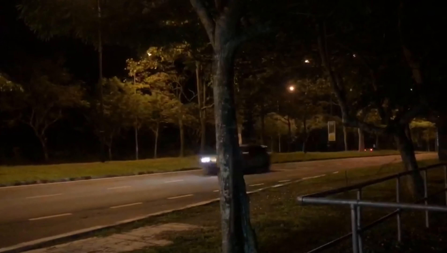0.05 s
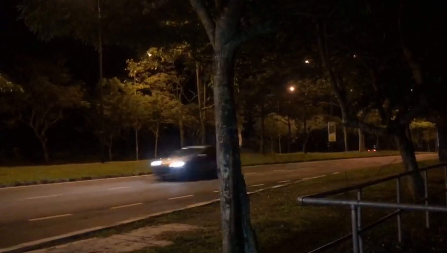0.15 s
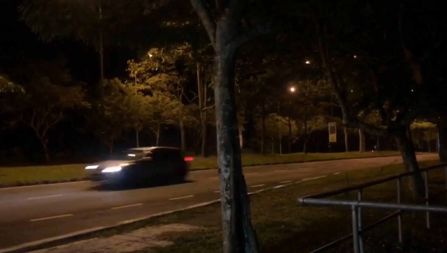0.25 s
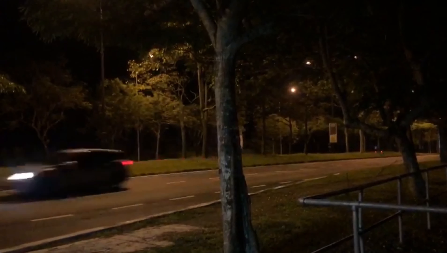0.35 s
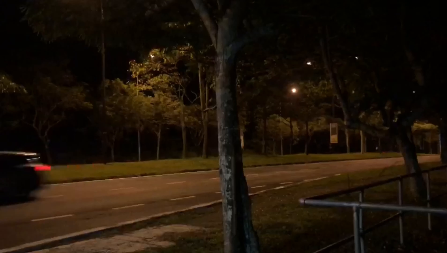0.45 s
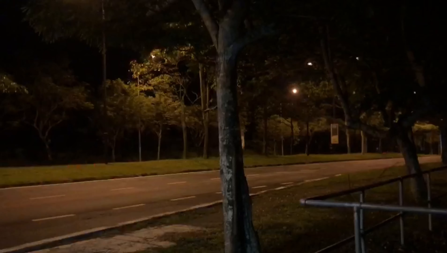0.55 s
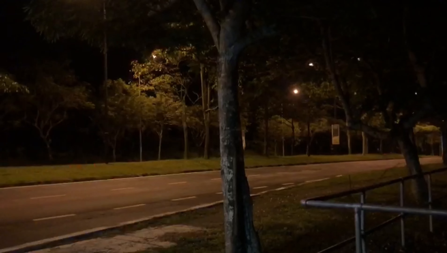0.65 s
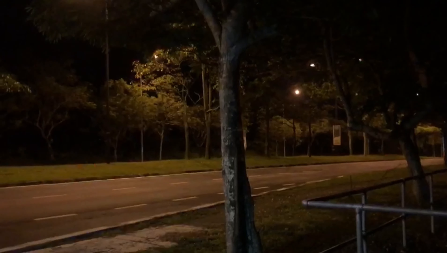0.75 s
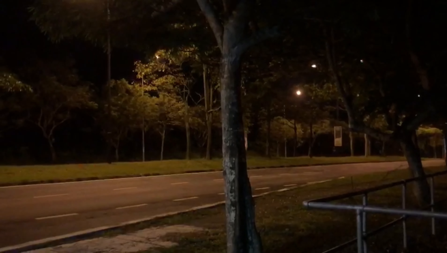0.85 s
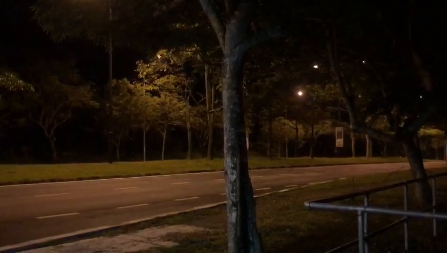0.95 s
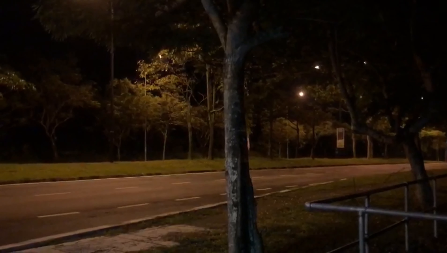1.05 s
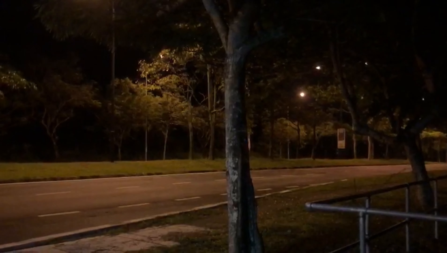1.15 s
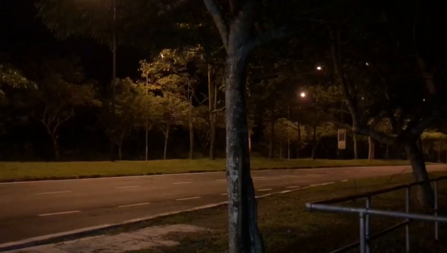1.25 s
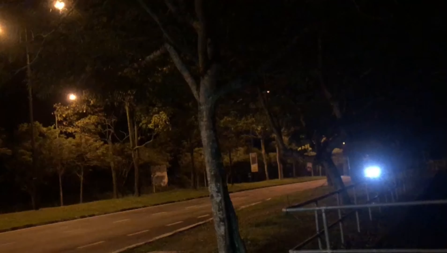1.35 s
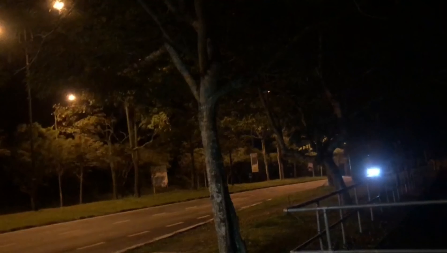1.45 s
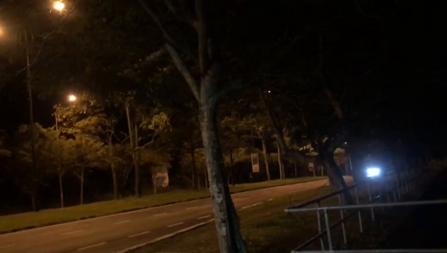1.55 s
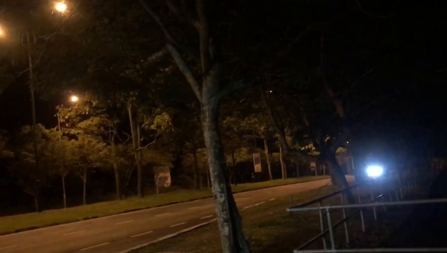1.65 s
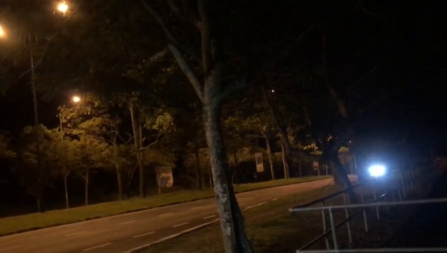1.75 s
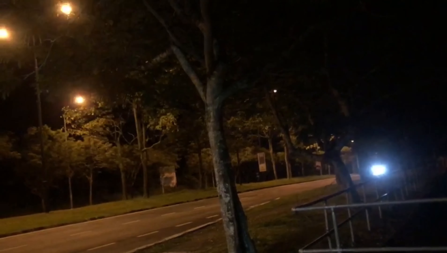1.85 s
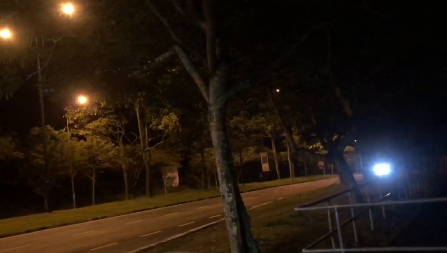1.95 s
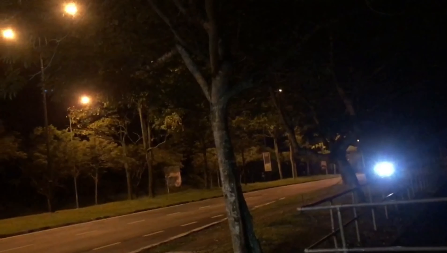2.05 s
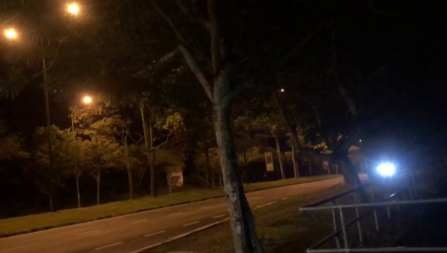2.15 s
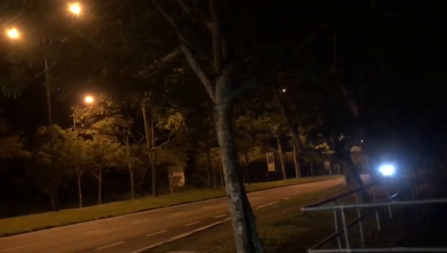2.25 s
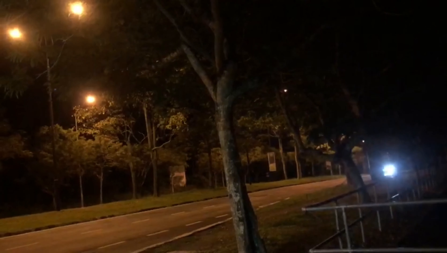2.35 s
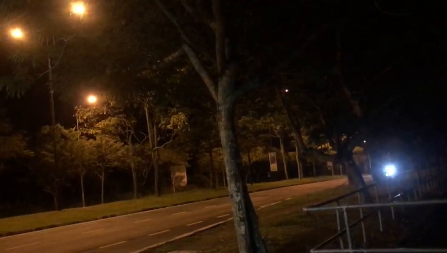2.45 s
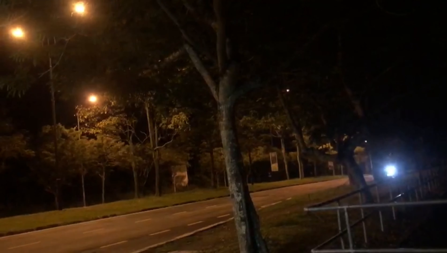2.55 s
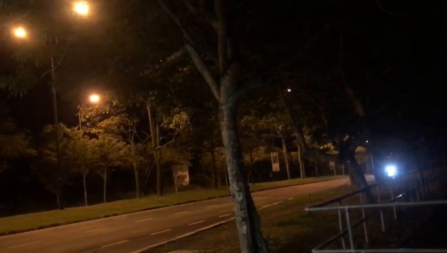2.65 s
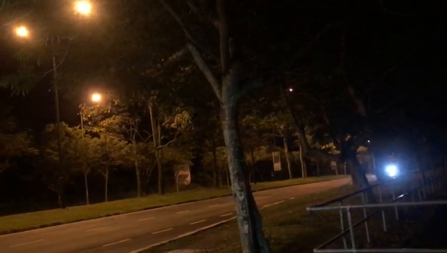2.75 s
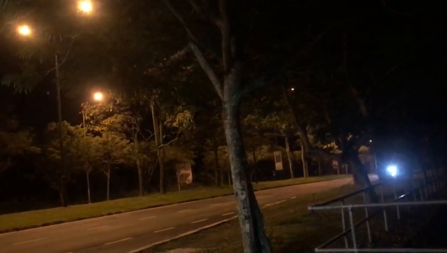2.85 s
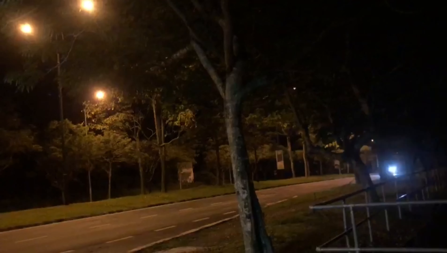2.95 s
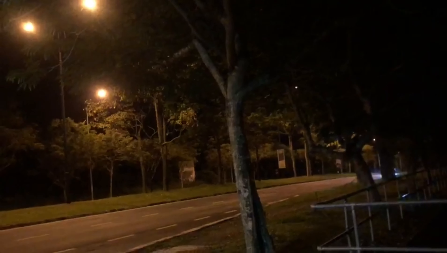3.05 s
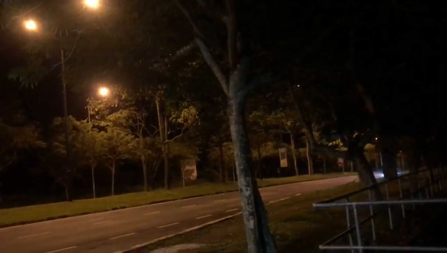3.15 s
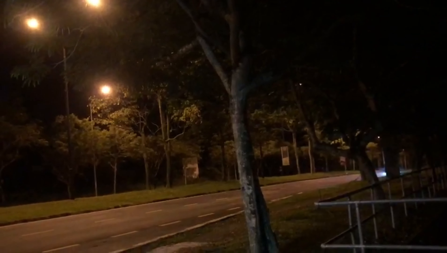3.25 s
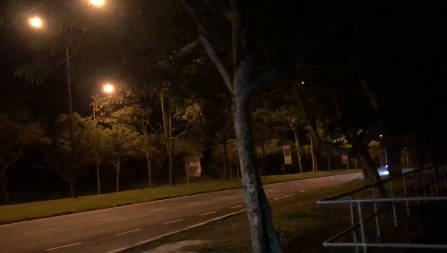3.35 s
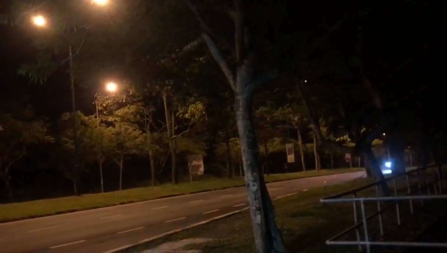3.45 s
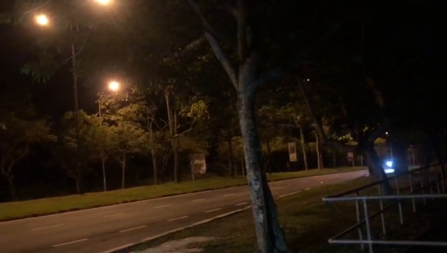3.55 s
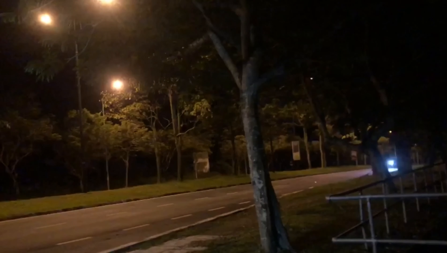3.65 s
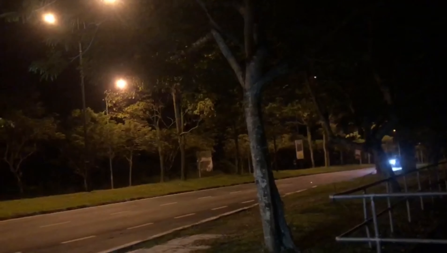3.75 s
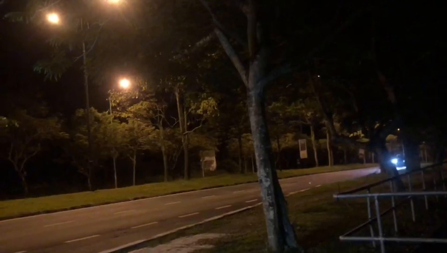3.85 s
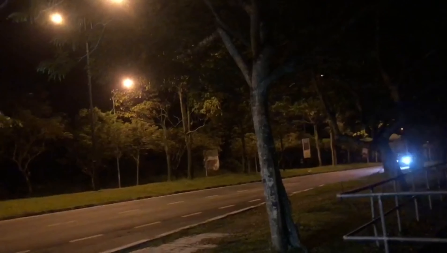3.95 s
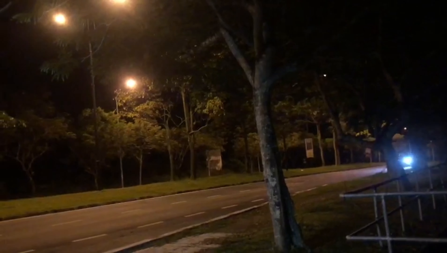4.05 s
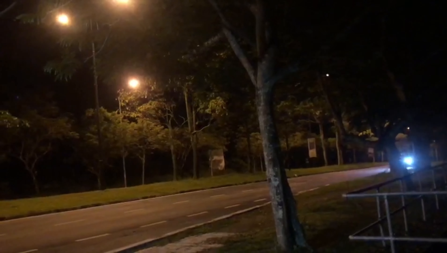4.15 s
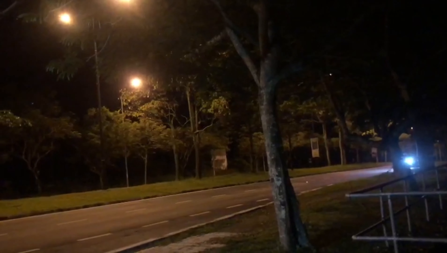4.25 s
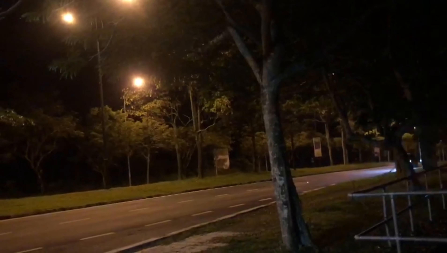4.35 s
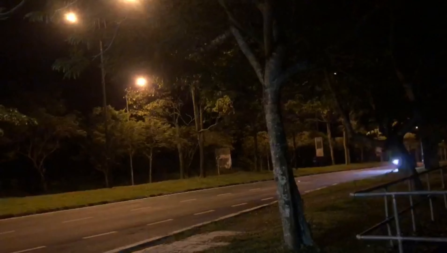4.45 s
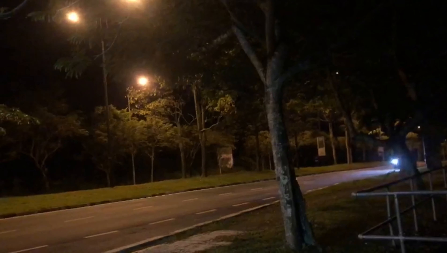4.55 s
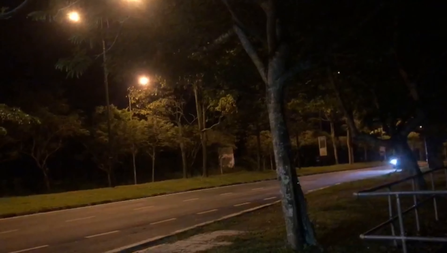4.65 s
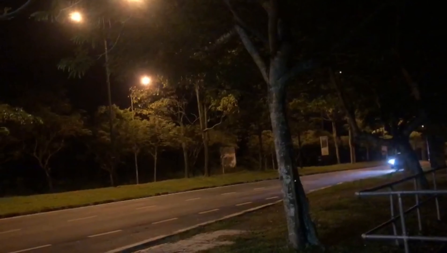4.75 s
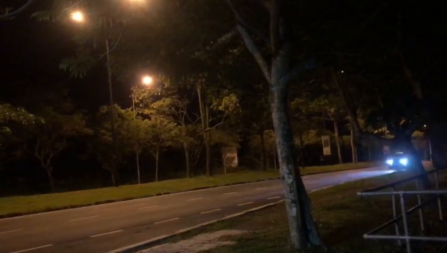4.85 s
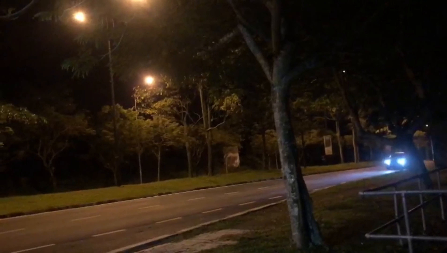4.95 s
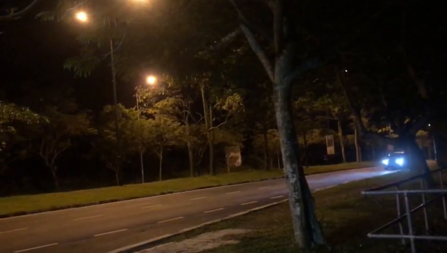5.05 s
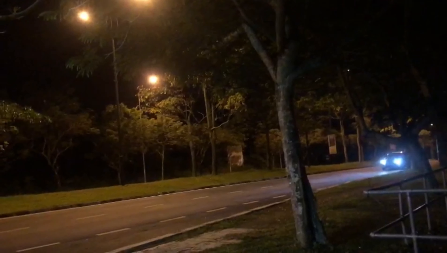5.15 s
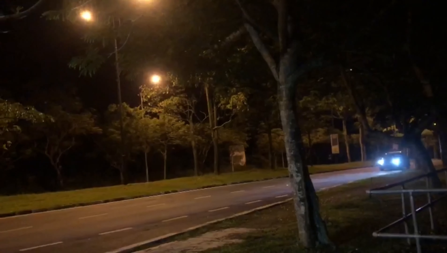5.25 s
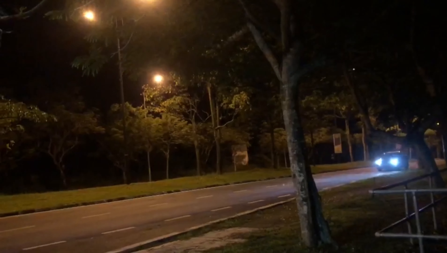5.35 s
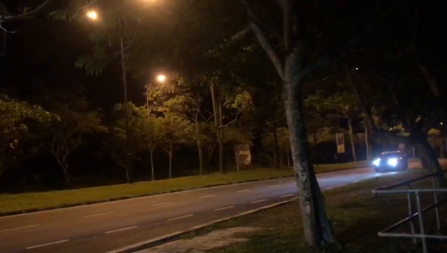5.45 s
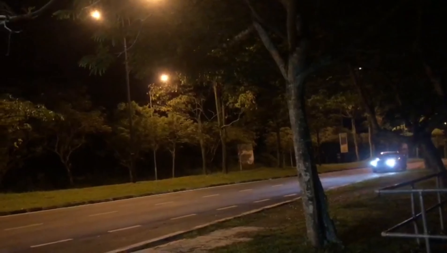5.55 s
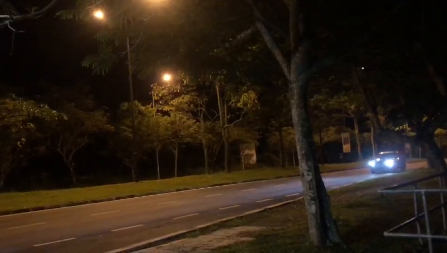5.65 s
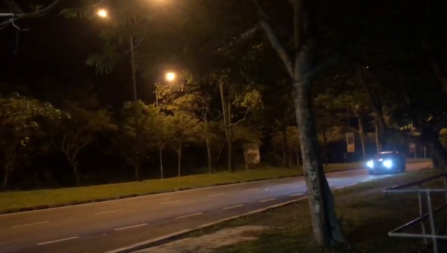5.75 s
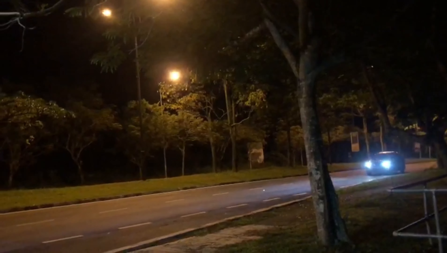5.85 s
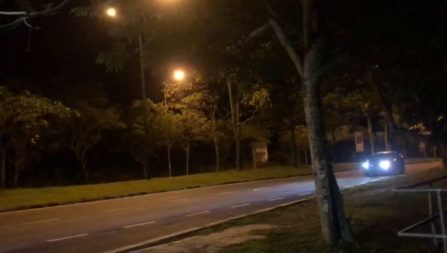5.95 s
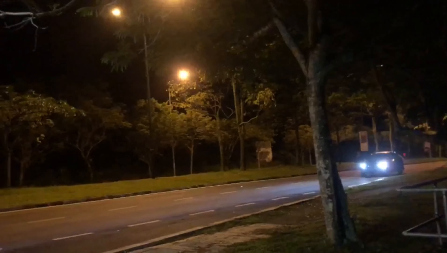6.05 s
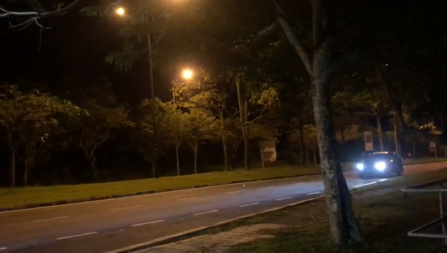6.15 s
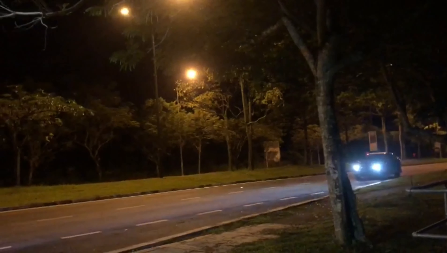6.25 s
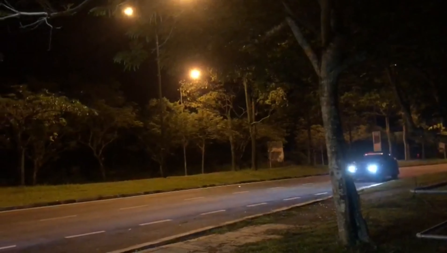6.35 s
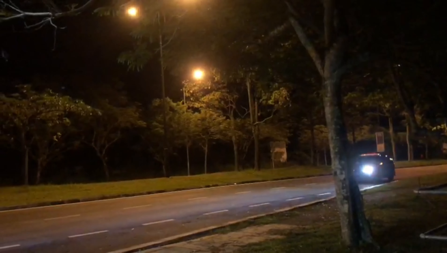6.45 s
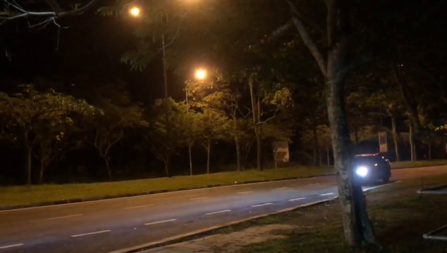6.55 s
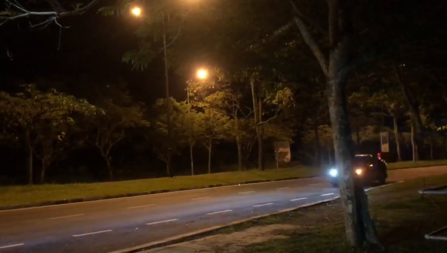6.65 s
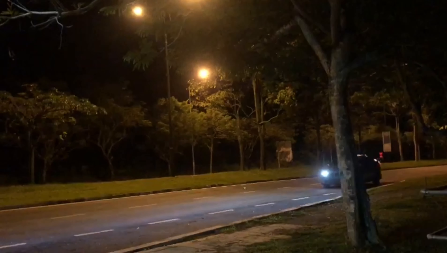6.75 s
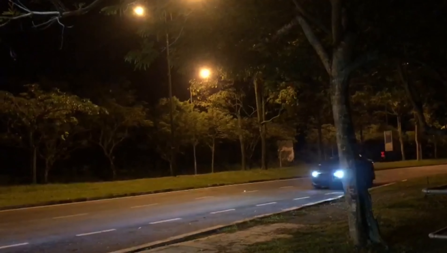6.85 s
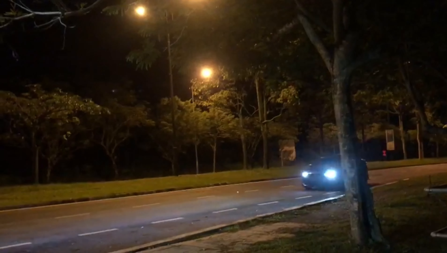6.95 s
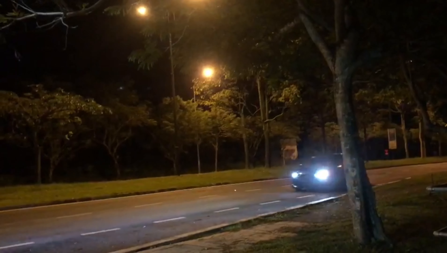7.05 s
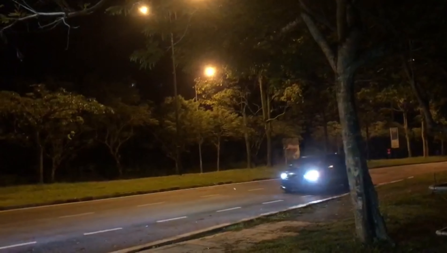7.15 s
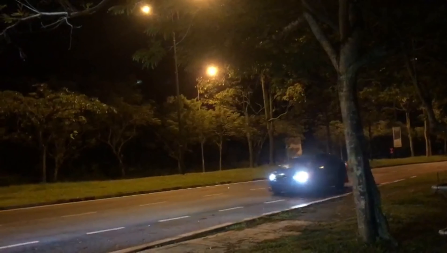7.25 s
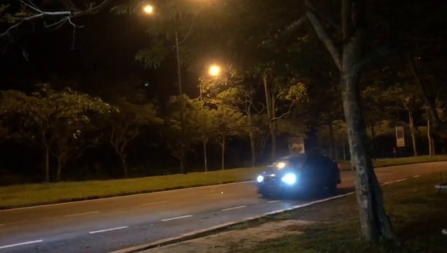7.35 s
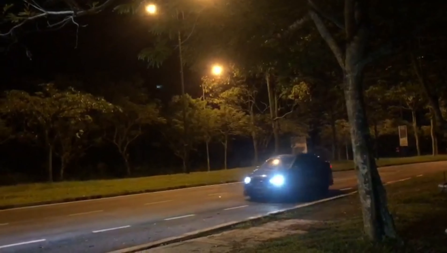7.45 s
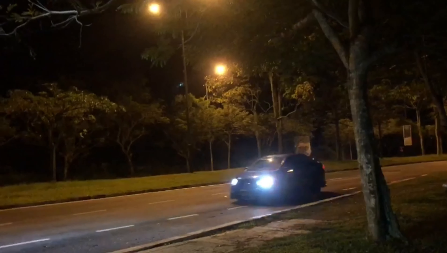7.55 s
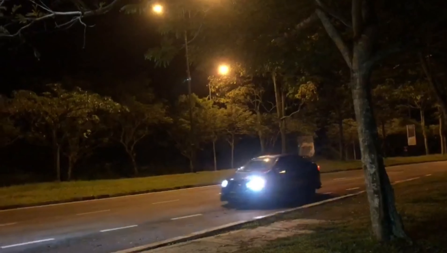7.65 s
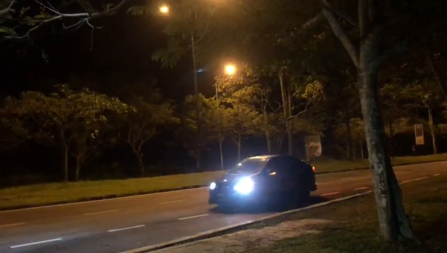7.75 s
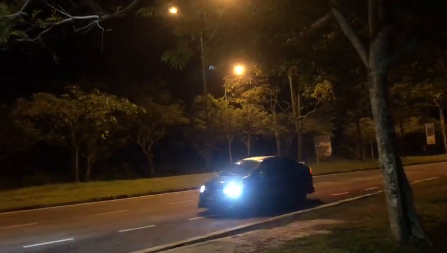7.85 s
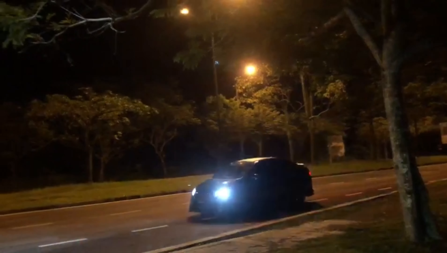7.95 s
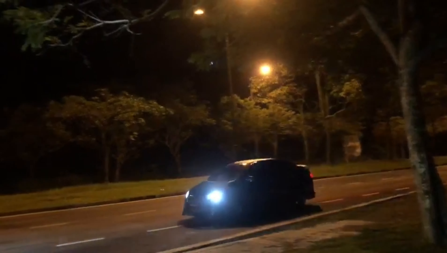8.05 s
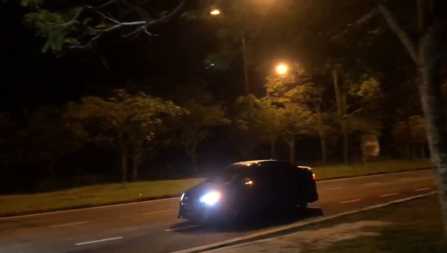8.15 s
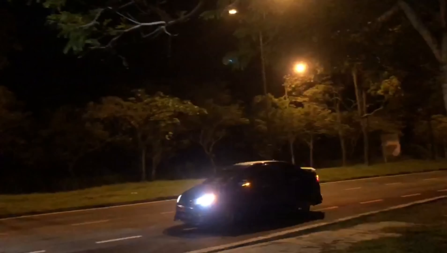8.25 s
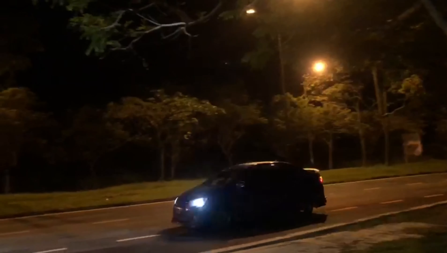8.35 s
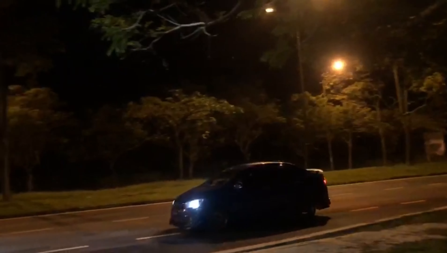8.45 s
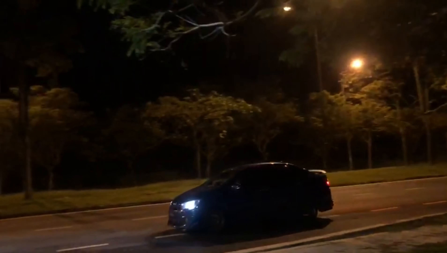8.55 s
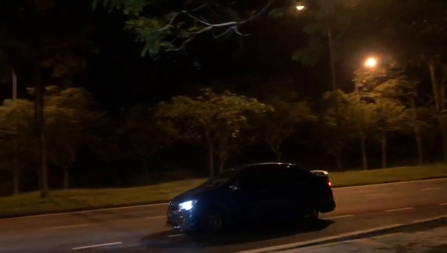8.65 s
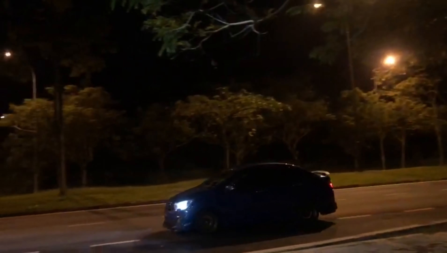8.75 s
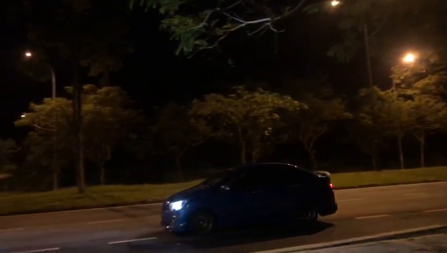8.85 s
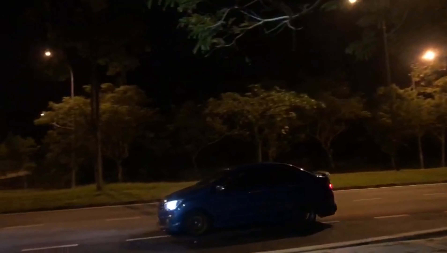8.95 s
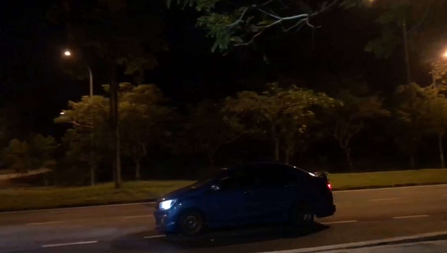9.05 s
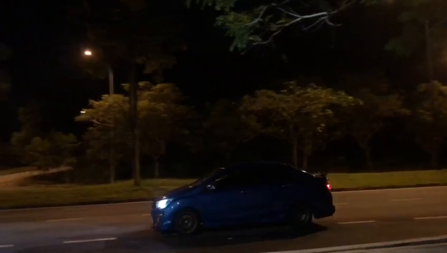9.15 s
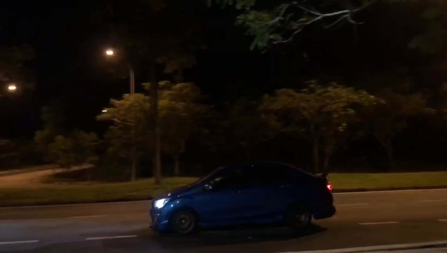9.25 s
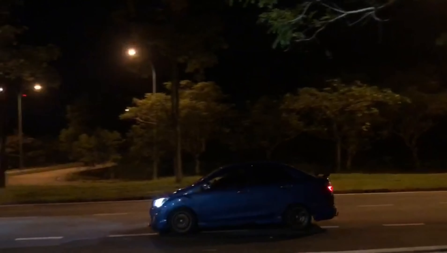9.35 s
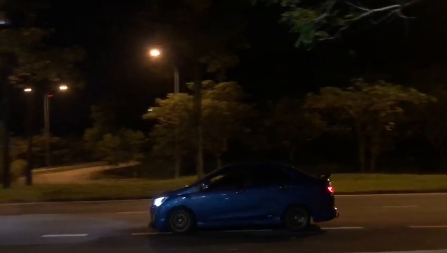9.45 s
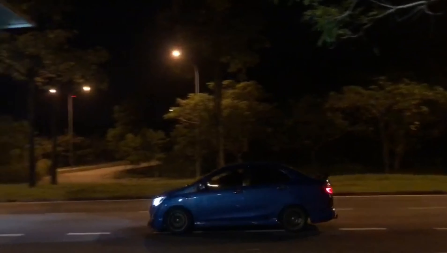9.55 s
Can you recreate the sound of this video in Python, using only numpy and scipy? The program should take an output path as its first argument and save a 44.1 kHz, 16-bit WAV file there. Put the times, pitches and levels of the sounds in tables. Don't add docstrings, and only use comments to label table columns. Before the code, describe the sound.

At a dark roadside, a phone catches a car rushing away with tyre roar and a sagging drone. It cuts abruptly to a much quieter night of crickets and distant town rumble. A car with an open exhaust coasts nearer, its low hum slowly sinking to a lumpy idle burble, tyres hissing softly. At the very end the throttle opens and the exhaust erupts, rising fast, loud, raspy and crackling.

```python
import sys
import numpy as np
from scipy import signal
from scipy.fft import rfft, irfft
from scipy.io import wavfile
from scipy.ndimage import uniform_filter1d

SR = 44100
rng = np.random.default_rng(int(sys.argv[2]) if len(sys.argv) > 2 else 0)


def dump_mix(stems):
    frames = np.atleast_2d(stems).T
    limited = np.clip(frames, -1, 1)
    pcm = np.round(limited * 32767).astype(np.int16)
    wavfile.write(sys.argv[1], SR, pcm)


def how_loud(loudness_db):
    steps = np.asarray(loudness_db, float) / 20
    return 10 ** steps


N = 422919
CUT_S, FADE_IN_S = 1.3542, 0.039

# time_s, drone_db, engine_db, tyre_roar_db
RECEDING_CAR = [(0.0, -36.5, -28, -24), (0.25, -32.5, -47, -24.5), (0.42, -30, -38, -24),
                (0.6, -25, -30.5, -26.5), (0.86, -26.5, -34.5, -30), (1.104, -33, -28, -29.5),
                (1.2, -39, -30.5, -31), (1.35, -37, -28, -34.5)]
# firing_multiple, level_db
RECEDING_ORDERS = [(2, 1), (3, -12), (4, -6), (5, -5.5), (6, -1.5)]
# freq_hz, density_db
RECEDING_ROAD = [(74, -13), (125, -1.5), (173, -3), (203, -6), (228, -2.5), (421, -6.5), (611, -7),
                 (832, -6), (1330, -3.5), (1720, -4), (6000, -30), (7800, -55), (13200, -120)]
# time_s, lag_ms
ROAD_ECHO = [(0, 0.98), (.3, 1.46), (.6, 1.72), (.9, 1.88), (1.35, 1.76)]

# time_s, firing_hz, level_db, boom_db_per_octave below the tail pipe, throttle_0_to_1
ENGINE = [(1.36, 64.46, -47, 1, 0), (2.07, 61.24, -42, -0.5, 0), (2.88, 58.25, -41.5, 1.5, 0.07),
          (3.26, 56.58, -44, -1.5, 0.06), (3.73, 52.62, -34.5, -7.5, 0.03), (4.4, 48.9, -37.5, -11, 0),
          (5.1, 45.08, -37, -4, 0.09), (5.7, 40.96, -34.5, -5.5, 0.04), (6.5, 39.6, -32.5, -3, 0.06),
          (7.2, 36.82, -29.5, -6.5, 0), (8.11, 33.58, -30, -3, 0.02), (8.28, 32.58, -26, -4, .15),
          (9.03, 32.88, -24.5, -0.5, 0.1), (9.2, 40.88, -20, -1, .3), (9.364, 59.37, -10.5, 2.5, 0.47),
          (9.42, 66.1, -9, 2.5, 0.75), (9.465, 71.34, -14, 4, 0.51), (9.59, 85.5, -13.5, 7.5, 0.69)]
# centre_hz, half_width_hz, steepness
PIPES = [
    (100, 21.1, 1.01),
    (180, 10.7, 0.89),
    (245.75, 22.95, 2.62),
]
PIPES_DB = [
    -0.3,
    -2,
    0.9,
]
# centre_hz, half_width_hz
HALF_RING = (242.6, 22)
# centre_hz, width_hz, level_db
RASP = [(374.6, 64, 7.5), (532, 107, -0.5), (741, 124, -2.5), (844, 330, -6.5), (1235, 220, -20)]
# time_s, level_db
SHADES = [
    (2.94, -8),
    (3.92, -5),
    (5.171, -11),
]
# time_s, roar_db
TYRES = [(1.36, -56), (4.41, -51.5), (6.22, -47.5), (7.91, -41.5), (9.22, -44.5), (9.59, -35)]
# freq_hz, density_db
TYRE_ROAR = [(290, 0.5), (500, -3.5), (603, -9), (727, 0), (835, -5), (1030, -6.5), (2010, -7), (3500, -17),
             (4550, -21), (7700, -120)]
# peak_s, level_db, centre_hz, width_hz, half_length_s
WHOOSHES = [
    (6.82, -47, 1360, 560, 0.55),
    (7.71, -51, 2050, 320, 0.35),
    (7.55, -50, 1120, 460, 0.45),
    (8.66, -55, 1533, 180, 0.53),
]
# time_s, peak_db
GRIT = [
    (8.701, -39),
    (8.7143, -31),
    (8.8853, -34),
]

# freq_hz, density_db
TOWN = [(15, -42), (25, -4.5), (117, -4), (194, -6.5), (257, -1), (471, -18), (638, -20.5), (910, -25),
        (2210, -28.5), (5090, -42.5), (6890, -35.5), (7820, -82), (10600, -51), (13800, -70), (22000, -120)]
# time_s, pitch_hz, level_db
FAN = [(1.36, 643, -55.5), (4.3, 641, -57.5), (6.2, 642, -67)]
# peak_s, level_db, centre_hz, width_hz, half_length_s
RUSTLES = [
    (2.02, -49, 4900, 7000, 0.047),
    (2.455, -56.5, 8060, 2010, 0.092),
    (4.27, -57, 8296, 1987, 0.069),
    (6.28, -57, 8300, 2000, .06),
    (8.152, -55, 8376, 1500, 0.04),
]

# centre_hz, width_hz, level_db, throb_hz
CHORUS = [(13100, 1200, -57.5, 95), (11960, 840, -61, 80), (11530, 850, -61.5, 70), (9400, 640, -68.5, 60),
          (5960, 140, -88.5, 24), (7000, 400, -69, 19)]
# start_s, length_s, level_db, centre_hz, width_hz
TRILLS = [(5.4, 1.155, -64, 7200, 220), (6.83, 0.85, -56, 7254, 220), (7.5, .5, -53, 7200, 240),
          (8.33, 0.64, -53, 7030, 200), (9.03, 0.31, -51, 7070, 260), (3.795, 0.33, -62, 5750, 200),
          (5.1, 1.5, -58, 5920, 260), (6.9, 1.34, -54, 5830, 379.6), (2.27, 0.1996, -60, 12200, 500),
          (4.2, .3, -53, 12160, 501), (5.15, .75, -53, 12150, 500), (9.27, .4, -49, 13100, 1100)]
# last_chirp_s, peak_db
THREES = [(1.5229, -47), (1.7001, -47.5), (1.8738, -47.5), (2.3359, -47.5), (2.6894, -48), (4.2376, -48),
          (4.415, -47.5), (4.5941, -47), (4.7677, -47.5), (4.9443, -48)]
# last_chirp_s, peak_db
TWOS = [(2.0164, -48), (2.1596, -48), (2.5133, -46), (2.8301, -47), (2.9743, -48), (3.1185, -48.5),
        (4.0583, -47.5), (5.0894, -50)]
# end_s, length_s, level_db
PHRASES = [(2.23, 0.73, -51), (3.125, 0.75, -51), (4.045, .76, -52.5), (4.975, .78, -52),
           (5.9, 0.88, -53.5), (6.875, 0.84, -51.5), (7.69, 0.57, -50), (8.5, 0.5, -52), (9.35, .68, -51.5),
           (9.9, .5, -50)]

CRACK_S, CRACK_LEAD = 9.411, 0.42


def level(x, db=0):
    return x * how_loud(db) / np.sqrt(np.mean(x ** 2))


def even(x, span_s):
    return x / np.sqrt(uniform_filter1d(x ** 2, int(span_s * SR)) + 1e-12)


def seconds():
    return np.arange(N) / SR


def columns(table):
    time_s, *rest = np.transpose(table)
    return [np.interp(seconds(), time_s, column) for column in rest]


def sine(hz):
    return np.sin(2 * np.pi * np.cumsum(hz) / SR)


def band(x, hz, width_hz):
    return signal.lfilter(*signal.iirpeak(hz, hz / width_hz, fs=SR), x)


def hiss(hz, width_hz):
    return level(band(band(rng.standard_normal(N), hz, width_hz), hz, width_hz))


def walk(rate_hz):
    hold = int(SR / rate_hz)
    held = np.repeat(rng.standard_normal(N // hold + 1), hold)
    return level(uniform_filter1d(uniform_filter1d(held, hold), hold)[:N])


def coloured(points, flicker_db, rate_hz):
    hz = np.maximum(np.fft.rfftfreq(N, 1 / SR), 1)
    f, db = np.transpose(points)
    shape_db = np.interp(np.log(hz), np.log(f), db, -120, -120)
    spectrum = rfft(rng.standard_normal(N)) * how_loud(shape_db)
    place = 2 * np.log2(hz / f[0])
    total = 0
    for k in range(int(2 * np.log2(f[-1] / f[0])) + 2):
        part = irfft(spectrum * np.clip(1 - abs(place - k), 0, 1), N)
        total = total + part * how_loud(flicker_db * walk(rate_hz))
    return level(total)


def swells(table, flicker_db, rate_hz):
    out = np.zeros(N)
    for peak_s, db, hz, width_hz, half_s in table:
        rise_fall = np.exp(-((seconds() - peak_s) / half_s) ** 2)
        out += how_loud(db + flicker_db * walk(rate_hz)) * rise_fall * hiss(hz, width_hz)
    return out


def gate(start_s, length_s, edge_s):
    t = seconds()
    return np.clip(np.minimum(t - start_s, start_s + length_s - t) / edge_s, 0, 1)


def trees(x, t60_s, wet_db, gap_s):
    t = np.arange(int(t60_s * SR)) / SR
    tail = rng.standard_normal(len(t)) * np.exp(-np.log(1000) * t / t60_s) * (t > gap_s)
    return x + how_loud(wet_db) * signal.fftconvolve(x, tail / np.sqrt(np.sum(tail ** 2)))[:N]


def passing_car():
    drone_db, engine_db, roar_db = columns(RECEDING_CAR)
    lag_ms, = columns(ROAD_ECHO)
    t = seconds()
    drone_hz, sag_hz_per_s, firing_hz = 78, 17, 45.33
    drone = np.sqrt(2) * np.sin(2 * np.pi * (drone_hz * t - sag_hz_per_s * t ** 2 / 2))
    engine = np.zeros(N)
    for k, db in RECEDING_ORDERS:
        phase = 2 * np.pi * k * firing_hz * t + 6 * rng.random() + 0.76 * walk(15.14)
        engine += how_loud(db + 1.6 * walk(9.1)) * np.sin(phase)
    road = coloured(RECEDING_ROAD, flicker_db=0.6, rate_hz=14)
    i = np.arange(N)
    echo = np.interp(i - lag_ms * SR / 1000, i, road)
    road = road + 0.45 * band(echo, 1300, 3000)
    tread = how_loud(-19.5) * hiss(4500, 8000)
    return how_loud(drone_db) * drone + how_loud(engine_db - 3) * level(engine) + how_loud(roar_db) * (level(road, 1) + tread)


def firing_phase(firing_hz):
    phase = np.cumsum(firing_hz) / SR
    return phase - phase[int(CRACK_S * SR)] - CRACK_LEAD


def order_gains(order, step):
    hz, level_db, boom_db, throttle = columns(ENGINE)
    for shade_s, db in SHADES:
        level_db = level_db + db * np.exp(-((seconds() - shade_s) / 0.04) ** 2)
    lift = 1 + 0.0035 * (np.minimum.accumulate(hz) - 33) + 0.15 * throttle
    at_pipe_hz = order * (hz / lift)[::step]
    gain = 0
    for (centre_hz, half_hz, steep), pipe_db in zip(PIPES, PIPES_DB):
        db = level_db + pipe_db + boom_db * np.log2(PIPES[-1][0] / centre_hz)
        off = (at_pipe_hz - centre_hz) / half_hz
        ring = (order % 1 == 0) / (1 + 1j * np.sqrt(2) * off - off ** 2) ** steep
        gain = gain + np.sqrt(2) * how_loud(db[::step]) * ring
    tail_db = level_db + PIPES_DB[2]
    half_db = -7 - 5 * throttle
    narrow = 0.08 + 1 / (1 + ((at_pipe_hz - HALF_RING[0]) / HALF_RING[1]) ** 4)
    is_half = (order % 1 > 0) * (at_pipe_hz > 70) * (at_pipe_hz < 290)
    gain = gain + is_half * how_loud((tail_db + half_db)[::step]) * narrow
    return gain / (1 + 1.3 * throttle[::step] * (68 / at_pipe_hz) ** 4)


def firing_orders(phase):
    step = 64
    order = np.arange(1, 25)[:, None] / 2
    tone = np.zeros(N)
    for k, coarse in zip(order[:, 0], order_gains(order, step)):
        gain = np.interp(np.arange(N), np.arange(0, N, step), coarse)
        turn = 2 * np.pi * k * phase + (0.14 + 1.6 * (k % 1)) * walk(15)
        tone -= (gain * how_loud(1.3 * walk(9)) * np.exp(1j * turn)).real
    return tone


def puff_rasp(puffs, phase, throttle):
    shut_db, open_db = -52.5, -6
    rasp_db = shut_db + (open_db - shut_db) * throttle
    gas_gain = how_loud(-0.9 * rasp_db - 48).clip(0, 0.09)
    gas = puffs + gas_gain * np.exp(-(phase % 1) / 0.56) * rng.standard_normal(N)
    rasp = sum(how_loud(db) * band(band(gas, hz, width_hz), hz, width_hz) for hz, width_hz, db in RASP)
    return how_loud(rasp_db) * even(rasp, 0.2)


def shock_crack(puffs, throttle):
    shock = puffs ** 3 * np.clip(throttle - 0.3, 0, 1) ** 1.5
    dulled = signal.lfilter(*signal.butter(3, 1550, fs=SR), shock)
    return how_loud(26) * band(dulled, 600, 800)


def exhaust():
    firing_hz, _, _, throttle = columns(ENGINE)
    phase = firing_phase(firing_hz)
    at = np.flatnonzero(np.diff(np.floor(phase + CRACK_LEAD)))
    puffs = np.zeros(N)
    puffs[at] = how_loud(1.2 * rng.standard_normal(len(at)))
    out = firing_orders(phase) - shock_crack(puffs, throttle) + puff_rasp(puffs, phase, throttle)
    return trees(out, t60_s=0.4, wet_db=-14, gap_s=0.012)


def tyres_and_jet():
    roar_db, = columns(TYRES)
    jet_shut_db, jet_open_db = -85.5, -44
    jet = how_loud(jet_shut_db + (jet_open_db - jet_shut_db) * columns(ENGINE)[-1])
    roar = (how_loud(roar_db) + jet) * coloured(TYRE_ROAR, flicker_db=1.5, rate_hz=13)
    return roar + (how_loud(roar_db - 7) + jet * how_loud(-9.5)) * hiss(3430, 9300)


def town():
    return level(coloured(TOWN, flicker_db=1, rate_hz=6), -39.5)


def far_fan():
    hum_hz, hum_db = columns(FAN)
    fade = np.clip(FAN[-1][0] - seconds(), 0, 1)
    return np.sqrt(2) * how_loud(hum_db + 2.2 * walk(14)) * fade * sine(hum_hz)


def cricket_chorus():
    out = np.zeros(N)
    for hz, width_hz, db, throb_hz in CHORUS:
        throb = 1 + 0.16 * np.sin(2 * np.pi * throb_hz * seconds() + walk(4.2))
        out += level(hiss(hz, width_hz) * throb * how_loud(0.56 * walk(3.66)), db)
    return out


def near_cricket():
    gap_s, first_db = 0.0312, -1.5
    u = np.arange(int(0.015 * SR)) / SR
    chirp = np.sin(np.pi * u / u[-1]) * np.sin(2 * np.pi * (7450 * u - 42000 * u ** 2))
    out = np.zeros(N)
    for count, groups in ((2, TWOS), (3, THREES)):
        for last_s, db in groups:
            for k in range(count):
                start = int((last_s - 0.002 - k * gap_s) * SR)
                out[start:start + len(u)] += how_loud(db - 1 + first_db * (k == count - 1)) * chirp
    return out


def bush_cricket():
    strokes_hz, swell_db, swell_share = 106.3, -9, 0.61
    swell = np.zeros(N)
    for end_s, length_s, db in PHRASES:
        start_s = end_s - length_s
        short_of_full = np.clip(1 - (seconds() - start_s) / (swell_share * length_s), 0, 1)
        swell += how_loud(db + swell_db * short_of_full) * gate(start_s, length_s, edge_s=0.015)
    stroke = np.cumsum(strokes_hz * (1 + 0.01 * walk(40))) / SR % 1
    pitch_hz = 12300 - 2200 * stroke + 120 * walk(300)
    shape = np.exp(-((stroke - 0.3) / 0.19) ** 2) * how_loud(1.3 * walk(90))
    return how_loud(-4 + 0.7 * walk(12)) * swell * level(shape * sine(pitch_hz))


def leaves():
    return swells(RUSTLES, flicker_db=1.5, rate_hz=170)


def cricket_trills():
    out = np.zeros(N)
    for start_s, length_s, db, hz, width_hz in TRILLS:
        out += how_loud(db) * gate(start_s, length_s, edge_s=0.017) * hiss(hz, width_hz)
    beat = 1 + 0.41 * np.sin(2 * np.pi * 48 * seconds() + 2 * walk(5.5))
    return how_loud(2.5 * walk(30) - 7) * out * beat


def kerb_whooshes():
    return swells(WHOOSHES, flicker_db=-0.5, rate_hz=8)


def grit():
    out = np.zeros(N)
    length = 400
    decay = np.exp(-np.arange(length) / SR / 0.0029)
    for time_s, db in GRIT:
        start = int(time_s * SR)
        out[start:start + length] += how_loud(db + 1) * band(decay * rng.standard_normal(length), 3460, 6010)
    return out


def scene():
    t = seconds()
    insects = level(hiss(13100, 1800), -57.5)
    before = passing_car() + insects
    car = exhaust() + tyres_and_jet() + kerb_whooshes() + grit()
    night = town() + far_fan() + cricket_chorus() + near_cricket()
    night += bush_cricket() + leaves() + cricket_trills()
    fade_in = np.clip((t - CUT_S) / FADE_IN_S, 0, 1) ** 2.3
    return np.where(t < CUT_S, before, (car + night) * fade_in)[None]


def low_pass(x):
    return signal.sosfilt(signal.butter(12, 15580, fs=SR, output="sos"), x)


def record(dry):
    bass_cut = signal.butter(5, 55, "high", fs=SR, output="sos")
    x = np.clip(signal.sosfilt(bass_cut, dry), -1, 1)
    top_pass = signal.ellip(10, 0.005, 50, 13900, "high", fs=SR, output="sos")
    top = signal.sosfiltfilt(top_pass, x)
    strength = uniform_filter1d(top ** 2, size=1024) * how_loud(2.5 * walk(25))
    strong = strength > np.quantile(strength, 0.7)
    kept = uniform_filter1d(1.0 * strong, size=512)
    return low_pass(x - (1 - kept) * top)


dry = scene()
out = record(dry)
dump_mix(out)
```